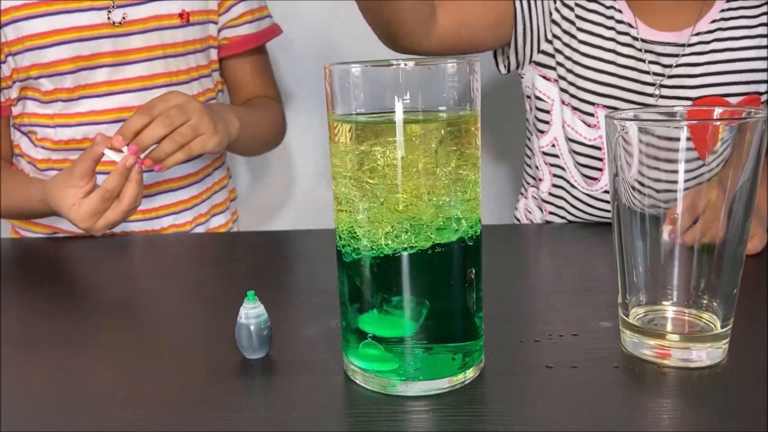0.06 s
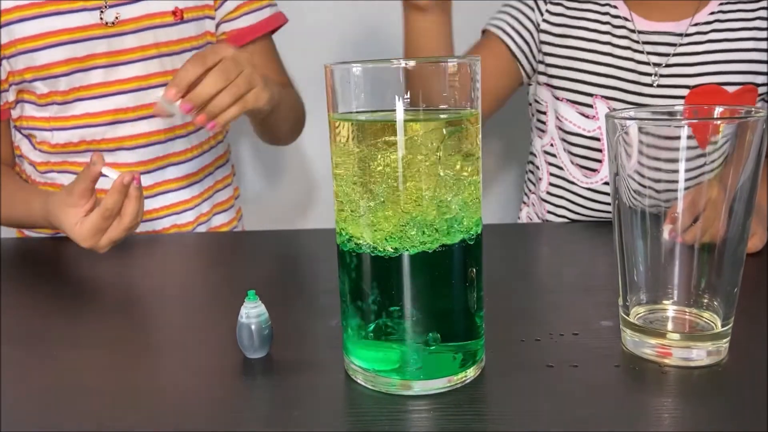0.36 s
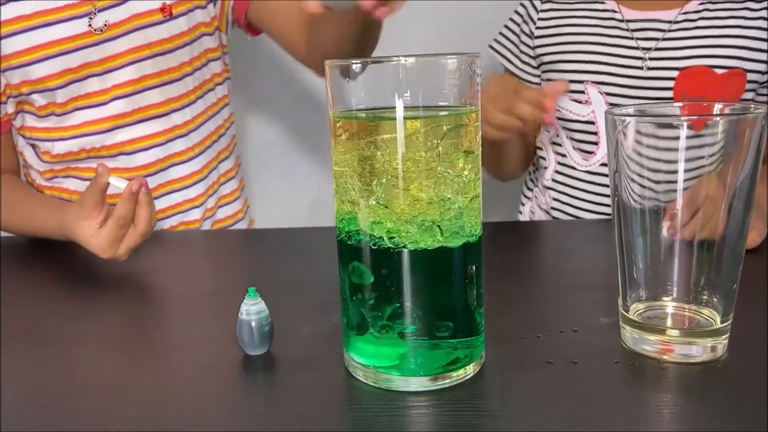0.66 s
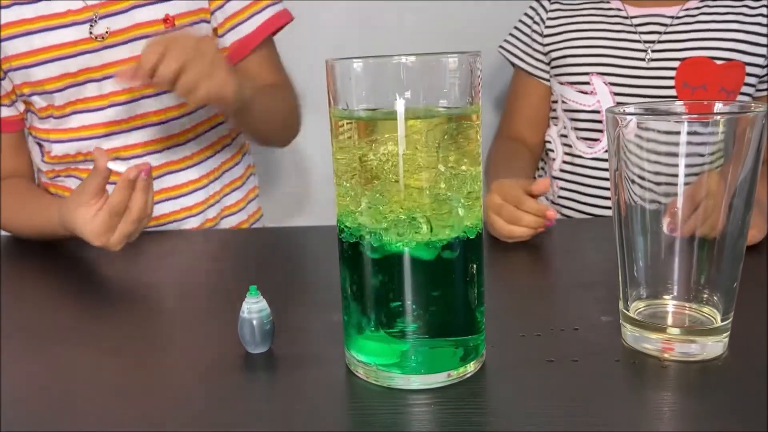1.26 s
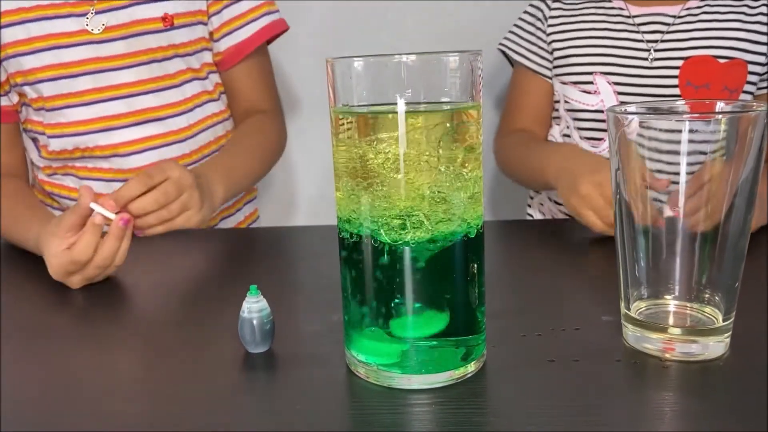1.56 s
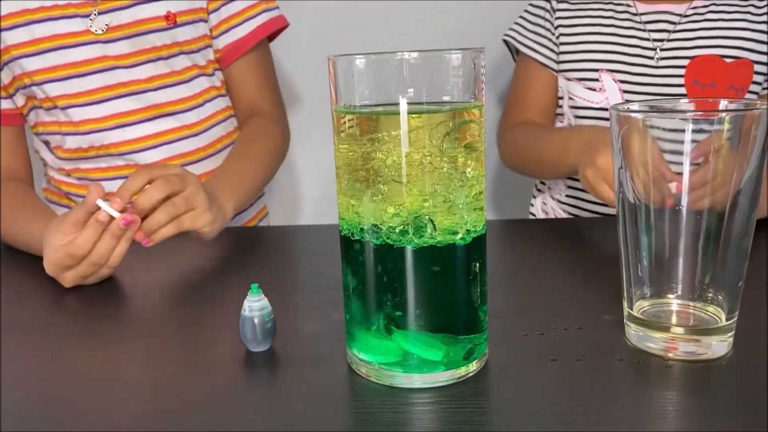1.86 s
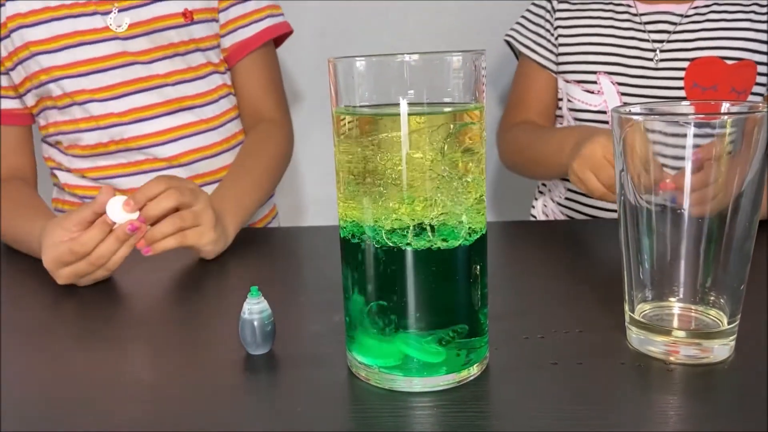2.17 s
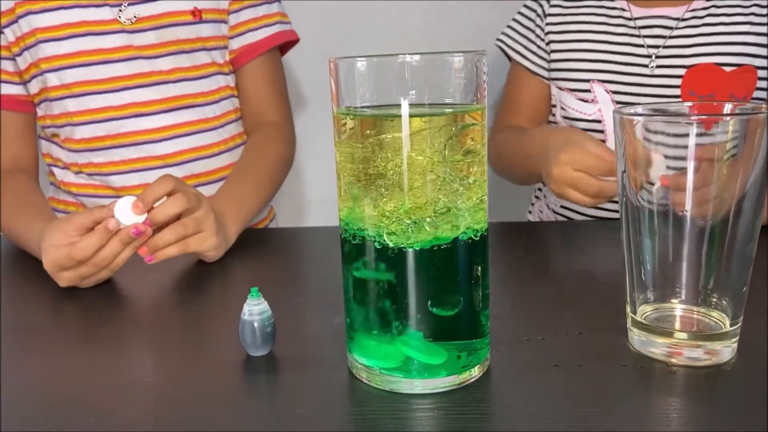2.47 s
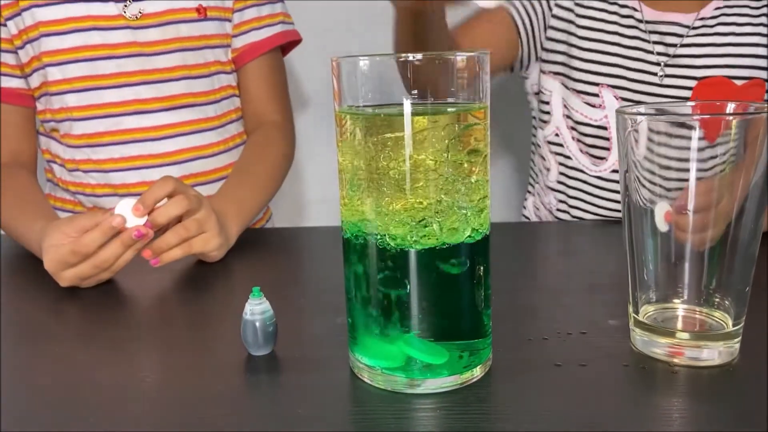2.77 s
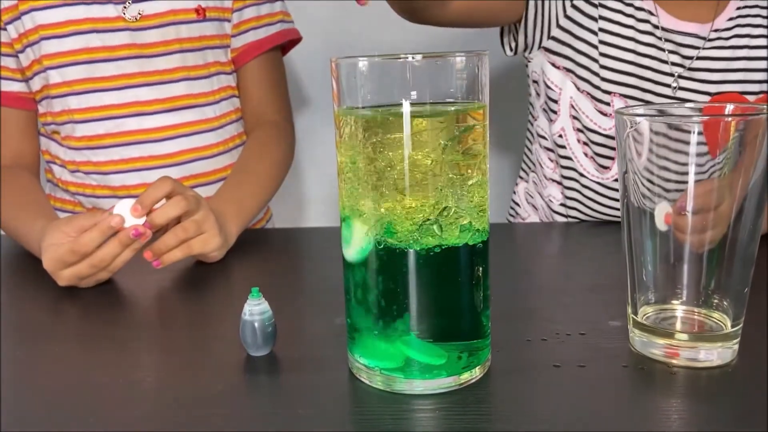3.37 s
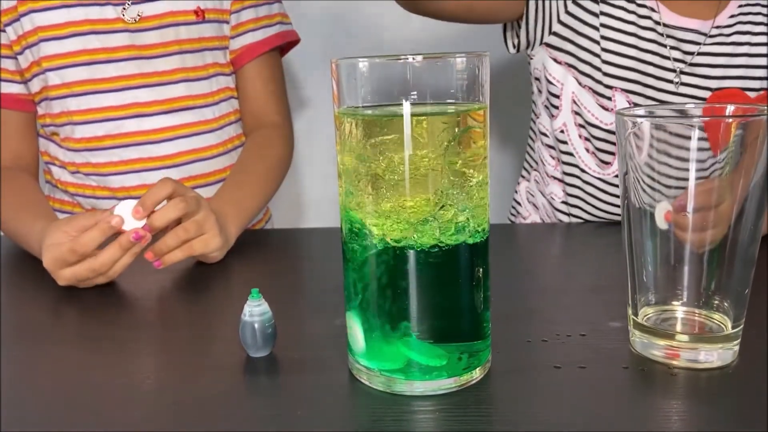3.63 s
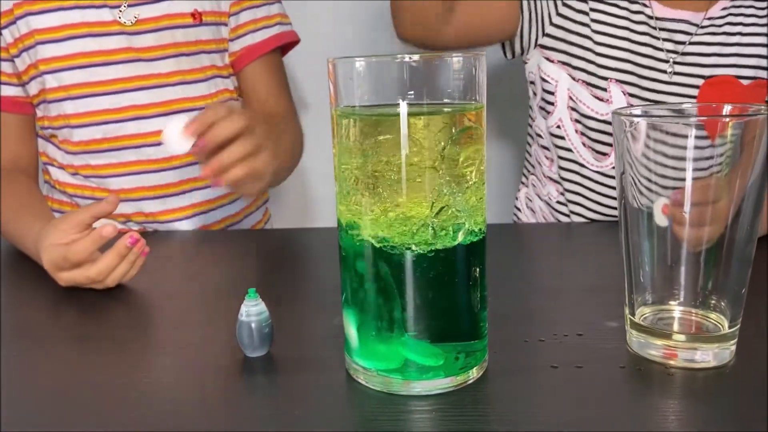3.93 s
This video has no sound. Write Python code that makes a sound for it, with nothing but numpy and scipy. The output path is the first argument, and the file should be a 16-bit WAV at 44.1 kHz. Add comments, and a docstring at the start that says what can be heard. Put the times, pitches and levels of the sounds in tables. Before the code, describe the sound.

Tablets plop into a glass of liquid and knock against it over a low hum.

```python
"""Fizzy tablets, dropped by two children, splash into a tall glass of oil and water.
Each impact on the surface gives a crack and spray and traps air, which resonates as bubbles;
the sinking tablets knock on the glass, mostly with low thuds and resonances of glass and table.
Faint fizz ticks, sleeves and fingers rustle by friction, and a dry tablet clicks near the end.
The small room reflects the sounds of the glass and is filled with a low ventilation hum."""
import sys
import numpy as np
from scipy import signal
from scipy.fft import rfft, irfft
from scipy.io import wavfile

SR = 44100
rng = np.random.default_rng(int(sys.argv[2]) if len(sys.argv) > 2 else 0)


def unload_wav(signal):
    """Save mono or channel-first audio to the path in sys.argv[1] as 16-bit WAV at rate SR, clipped to [-1, 1]."""
    wavfile.write(
        sys.argv[1],
        SR,
        np.round(np.clip(np.atleast_2d(signal).T, -1, 1) * 32767).astype(np.int16),
    )


N = 176400
T = np.arange(N) / SR
HZ = np.maximum(np.arange(N // 2 + 1) * SR / N, 1)

# Spectra of the noise sources and the reverberation. Each row: frequency in Hz, relative level in dB.
AIR_SPECTRUM = [(20, -37), (30, -18.5), (42, -6), (58, 0.5), (75, -2.5), (94, -1), (135, -11), (180, -8.5),
                (215, -13), (290, -18.5), (380, -21), (560, -29.5), (900, -29), (1400, -35), (1750, -46)]
HISS_SPECTRUM = [(1000, 14.5), (2500, 3), (5000, 1), (8000, -1.5), (15000, -6.5)]
CLOTH_SPECTRUM = [(600, -3.5), (1800, -1.5), (3100, -1), (4500, -9.5), (7000, -23), (15000, -32)]
RUB_SPECTRUM = [(3000, -22), (7000, -3), (11000, -0.5), (15000, 2)]
SPRAY_SPECTRUM = [(200, 18), (400, 6), (800, 5), (1300, 17), (1750, -16.5), (2300, 6.5), (2750, 3.5),
                  (3300, 5), (4200, -2.5), (4900, 3), (5600, -5.5), (6500, 4.5), (8000, -2.5), (15000, -11)]
ROOM_SPECTRUM = [(150, -7), (400, 1), (800, -7), (1600, -2.5), (3000, -0.5), (7000, -2), (15000, -3.5)]
# Likeness of the two channels. Each row: frequency in Hz, left-right correlation.
NOISE_COHERENCE = [(30, 1), (120, 0.93), (250, 0.67), (600, 0.12), (1500, 0.053), (5000, 0.55), (12000, 1)]
ROOM_COHERENCE = [(150, 0.66), (350, .6), (700, 0.25), (1300, 0.043), (5000, 0.13), (11000, 1)]
# Swell of the deepest rumble. Each row: time in seconds, gain in dB.
RUMBLE_SWELL = [(0, 1), (.6, 0.5), (1.25, 3.5), (1.9, 2.5), (2.5, -5.5), (3.2, 1), (4, -3.5)]
# Ventilation tones. Each row: frequency in Hz, rms level in dB.
HUM_TONES = [(58.5, -61.5), (119, -62.5), (187, -64.5)]
# Reflections from table and walls. Each row: delay in seconds, gain in dB, pan in dB,
# lag of the right side in seconds.
ECHOES = [(.0031, -11.5, 2.5, .0002), (.0086, -10, -5.5, -0.0096), (0.011, -10.5, 2, -.0004),
          (.0165, -14.5, -1.5, .0005), (.0205, -18, -10.5, -.0003), (.0275, -21, -6, .0006)]
# Sleeves moving and fingers rubbing dry tablets. Each row: time in seconds, level in dB.
SLEEVE_LEVELS = [(0, -89), (.4, -89), (.6, -78.5), (.78, -76), (.92, -82.5), (1.25, -93), (1.42, -75),
                 (1.64, -88.5), (1.82, -76), (1.93, -84.5), (2.12, -76.5), (2.22, -82.5), (2.52, -76.5),
                 (2.65, -89.5), (2.73, -79), (2.84, -85.5), (2.89, -74.5), (2.98, -90.5), (3.7, -93.5),
                 (3.82, -78), (3.92, -91), (4, -78.5)]
RUB_LEVELS = [(0, -107), (.45, -86.5), (.73, -78.5), (.84, -92), (1.32, -91), (1.42, -75.5), (1.54, -90),
              (1.85, -86), (2.1, -85.5), (2.28, -92), (2.45, -83), (2.54, -88), (2.9, -84), (3.1, -91),
              (3.65, -91.5), (3.98, -83.5)]
# Low thuds and resonances of glass and table, mostly sounding with the tablets' knocks.
# Each row: start in seconds, frequency in Hz, level in dB, T60 in seconds.
THUDS = [(1.535, 231, -45.5, 0.21), (1.61, 630, -60, 0.043), (1.726, 330, -47, 0.029),
         (2.122, 66, -33.5, 0.05), (3.313, 336, -51.5, 0.052), (3.671, 168, -41, 0.15),
         (3.68, 311.3, -49, .33), (3.747, 94, -43, 0.19)]
# Modes of the thin wall and the filled glass. Each row: frequency in Hz, gain in dB, T60 in seconds.
WALL_MODES = [(529.6, -2, 0.93), (1300, -2.5, 0.69)]
GLASS_MODES = [(248.8, -22, 0.38), (310.4, -17.5, 0.34), (405, -8, 0.09), (454.7, -9, 0.084),
               (616, -20.5, 0.14), (762, -14.5, 0.078), (850, -15.5, 0.18), (946, -23.5, 0.15),
               (1088, -14, 0.052), (1421, -7.5, 0.021), (1585, -8.5, 0.029), (1744, -11, 0.023),
               (2260, -17.5, 0.024), (2430, -22, 0.02)]
# A tablet clips the wall. Each row: start in seconds, level in dB.
WALL_TAPS = [(3.3761, -60.5)]
# A tablet meets the glass. Each row: start in seconds, knock level in dB, its frequency in Hz,
# its T60 in seconds, glass ring gain in dB, the ring's low and high edges in Hz, pan in dB.
KNOCKS = [(0.2333, -28, 754, 0.035, -33.5, 1170, 2320, 0),
          (1.6835, -38.5, 822, 0.018, -49.5, 600, 2230, -1),
          (1.724, -32.5, 1220, 0.0086, -41.5, 400, 1720, 1), (2.119, -46, 860, 0.011, -59.5, 600, 1310, 4),
          (3.3112, -46.5, 714, 0.069, -47, 397, 1190, 5), (3.3763, -33.5, 710, 0.022, -37, 980, 3300, 1),
          (3.6674, -20.5, 712, 0.017, -28, 227, 1366, 2.5)]
# Bubble plips and, in the last two rows, a small, close, dry tablet click.
# Each row: start in seconds, frequency in Hz, level in dB, T60 in seconds,
# fractional rise in pitch, pan in dB, relative gain into the room in dB.
PLIPS_AND_CLICK = [(1.0015, 4740, -32.5, 0.011, 0.13, 5.5, -2), (1.001, 1286, -41.5, 0.019, 0.055, 7, -2),
                   (1.001, 2090, -49.5, 0.018, 0.065, 3, -4), (1.0022, 3480, -45, 0.0073, 0.14, 8, 1),
                   (1.2112, 7100, -53, 0.0045, 0.088, 1, 2), (1.2255, 6700, -58, 0.0054, .12, 1, 1),
                   (1.264, 7100, -67, 0.0087, .04, 3, -4), (1.7225, 7270, -47.5, 0.011, .12, 0, -8),
                   (1.7219, 2550, -51, 0.0077, .15, 6, 0), (3.3117, 1686, -32, 0.023, 0.17, 3, 3.5),
                   (3.3104, 7200, -58, 0.006, 0.017, 2, 1), (3.314, 1040, -52.5, 0.046, 0.027, 3.5, 2),
                   (3.3758, 2320, -35.5, 0.01, 0.1, 4, -2), (3.3765, 3200, -48, 0.01, .12, 6, 5),
                   (3.376, 5030, -40, 0.0047, 0.13, 17, -15), (3.375, 5800, -32, 0.0043, 0.075, 6.5, -13),
                   (3.8827, 4300, -54, 0.018, 0.16, 4, -5), (3.885, 4440, -45.5, 0.013, 0.14, 6, -11)]
# A tablet or droplet hits the liquid. Each row: start in seconds, spray level in dB,
# its time constant in seconds, its high edge in Hz, crack level in dB, pan in dB.
SLAPS = [(0.9728, -48.5, 0.0059, 3230, -52, 1), (1.0005, -37, 0.0031, 14800, -27.5, 0),
         (1.6832, -62, 0.0044, 4620, -64, 3), (1.7225, -49.5, 0.0036, 2930, -45, 1.5),
         (2.612, -89, 0.0017, 15000, -59, 8), (2.9, -82, .003, 14700, -57, 3),
         (3.258, -69, .008, 11800, -58, 3), (3.3112, -46, 0.0024, 15320, -35.5, 2),
         (3.3757, -43, 0.0034, 6300, -44, 0.5), (3.667, -47.5, 0.0039, 2500, -61, 1),
         (3.812, -78, 0.0054, 12970, -68, 4), (3.8865, -66, 0.0024, 9950, -51, -1)]
# Phase between the microphone ports. Each row: frequency in Hz, lead of the left side in radians.
PORT_PHASE = [(20, 0), (3000, .45), (6900, 0), (9050, -3.14), (11100, -6.28), (13300, -9.42),
              (15000, -12.4)]


def from_db(db):
    """Amplitude grows tenfold every 20 dB."""
    return 10 ** (np.asarray(db) / 20)


def unit_rms(x):
    """Normalisation to unit mean power."""
    return x / np.sqrt(np.mean(x ** 2) + 1e-20)


def at_hz(points):
    """Interpolation on a logarithmic frequency axis."""
    hz, value = np.transpose(points)
    return np.interp(np.log(HZ), np.log(hz), value)


def envelope(points):
    """Amplitude over time, interpolated in decibels."""
    return from_db(np.interp(T, *np.transpose(points)))


def colour(x, spectrum):
    """Zero-phase filtering imposes a spectral shape."""
    return irfft(rfft(x) * from_db(at_hz(spectrum)), N)


def cut(x, hz, kind, order=2):
    """Causal high- or low-pass filtering."""
    return signal.sosfilt(signal.butter(order, hz, kind, fs=SR, output="sos"), x + 1e-18)


def stereo_noise(coherence):
    """Partial coherence: white noise with an in-phase and an antiphase part."""
    mid, side = rfft(rng.standard_normal((2, N)))
    spectrum = np.sqrt(1 + coherence) * mid + np.sqrt(1 - coherence) * side * [[1], [-1]]
    return unit_rms(irfft(spectrum, N))


def ring(hz, t60, rise=0):
    """A damped oscillator loses 60 dB in t60 seconds while its pitch gains the fraction rise."""
    t = T[:SR // 2]
    pitch = hz * (1 + rise * np.minimum(t / t60, 1))
    return from_db(-60 * t / t60) * np.sin(2 * np.pi * np.cumsum(pitch) / SR)


def attack(x, rise_s):
    """A finite rise time rounds the onset."""
    return x * (1 - np.exp(-T[:x.shape[-1]] / rise_s))


def add(out, sound, start, db, pan_db=0):
    """Superposition of a sound on the mix; pan is left level minus right level."""
    i = int(start * SR)
    part = sound[..., :N - i]
    out[:, i:i + part.shape[-1]] += from_db([[db + pan_db / 2], [db - pan_db / 2]]) * part


def ventilation():
    """Broadband noise and line spectrum: a slowly swelling rumble, thin hiss and steady hum."""
    coherence = at_hz(NOISE_COHERENCE)
    air = colour(stereo_noise(coherence), AIR_SPECTRUM)
    air = unit_rms(cut(air, 1700, "low", order=4))
    rumble = irfft(rfft(air) / (1 + (HZ / 100) ** 4), N)  # the part below 100 Hz
    air += rumble * (envelope(RUMBLE_SWELL) - 1)
    hiss = unit_rms(colour(stereo_noise(coherence), HISS_SPECTRUM))
    hum = sum(from_db(db) * np.sqrt(2) * np.sin(2 * np.pi * (hz * T + rng.random()))
              for hz, db in HUM_TONES)
    return from_db(-51.5) * air + from_db(-82) * hiss + hum


def room(x, t60=0.42, gap_s=0.004):
    """Reverberation: early reflections reach the two sides at different times over a diffuse tail."""
    fade = from_db(-60 * T / t60) * (T > gap_s)
    diffuse = colour(stereo_noise(at_hz(ROOM_COHERENCE)), ROOM_SPECTRUM)
    response = diffuse * fade / np.sqrt(np.sum(fade ** 2))
    for delay, db, pan_db, lag_s in ECHOES:
        response[0, int(delay * SR)] += from_db(db + pan_db / 2)
        response[1, int((delay + lag_s) * SR)] += from_db(db - pan_db / 2)
    return signal.fftconvolve(x, response[:, :SR], axes=1)[:, :N]


def rustle(levels, spectrum, roughness_db=1.5):
    """Friction noise of cloth or fingers, modulated by slow flutter and fine grain."""
    flutter = unit_rms(cut(rng.standard_normal(N), 24.9, "low"))
    grain = unit_rms(cut(rng.standard_normal(N), 600, "low"))  # single fibres catching
    friction = stereo_noise(at_hz(NOISE_COHERENCE)) * from_db(roughness_db * (flutter + grain))
    return envelope(levels) * unit_rms(colour(friction, spectrum))


def low_thuds():
    """Damped resonance: glass and table thud and ring at low frequencies."""
    out = np.zeros((2, N))
    for start, hz, db, t60 in THUDS:
        add(out, cut(ring(hz, t60), 2 * hz, "low"), start, db)
    return out


def fizz(ticks_per_s=56):
    """Shot noise: tiny bubbles burst independently at the surface."""
    bursts = rng.random(N) < ticks_per_s / SR
    strength = from_db(-73.5 - 4 * np.minimum(rng.exponential(1, N), 3))
    return cut(bursts * strength, 2500, "high")


def wall_ring():
    """Free vibration: tapped above the liquid, the lightly damped glass wall sings on faintly."""
    out = np.zeros((2, N))
    tone = sum(from_db(db) * ring(hz, t60) for hz, db, t60 in WALL_MODES)
    for start, db in WALL_TAPS:
        add(out, tone, start, db)
    return out


def glass_knocks():
    """Modal excitation: each contact knocks and rings a band of modes; the liquid cushions some."""
    out = np.zeros((2, N))
    modes = sum(from_db(db) * ring(hz, t60) for hz, db, t60 in GLASS_MODES)
    for start, db, hz, t60, ring_db, low_hz, high_hz, pan_db in KNOCKS:
        knock = from_db(db) * cut(ring(hz, t60), 2 * hz, "low")
        band = cut(cut(modes, low_hz, "high", order=3), high_hz, "low", order=9)
        contact = attack(knock + from_db(ring_db) * band, rise_s=0.0012)
        add(out, contact, start, 0, pan_db)
    return out


def plips_and_click():
    """Brief resonances of rising pitch: bubbles plip and a tablet clicks, direct and into the room."""
    direct, to_room = np.zeros((2, 2, N))
    for start, hz, db, t60, rise, pan_db, room_db in PLIPS_AND_CLICK:
        ping = attack(ring(hz, t60, rise), rise_s=0.00069)
        add(direct, ping, start, db, pan_db)
        add(to_room, ping, start, db + room_db, pan_db)
    return direct, to_room


def surface_slaps(rise_s=0.00046):
    """Impact on a liquid radiates an impulsive crack, then spray that dies in milliseconds."""
    out = np.zeros((2, N))
    spray = unit_rms(colour(stereo_noise(coherence=0.92), SPRAY_SPECTRUM))
    t = T[:SR // 10]
    crack = cut(1. * (t == 0), 2500, "high", order=1)
    for k, (start, db, decay_s, high_hz, crack_db, pan_db) in enumerate(SLAPS):
        noise = spray[:, k * len(t):(k + 1) * len(t)]
        burst = attack(noise * np.exp(-t / decay_s), rise_s)
        add(out, cut(burst, high_hz, "low"), start, db, pan_db)
        add(out, crack, start + rise_s, crack_db, pan_db)
    return out


def scene():
    """Superposition of all sources; the sharp, short sounds also excite the room."""
    rustles = rustle(SLEEVE_LEVELS, CLOTH_SPECTRUM) + rustle(RUB_LEVELS, RUB_SPECTRUM)
    hits = glass_knocks() + surface_slaps() + fizz()
    pings, pings_to_room = plips_and_click()
    reverberation = room(hits + pings_to_room)
    return hits + pings + wall_ring() + low_thuds() + reverberation + rustles + ventilation()


def record(dry, cutoff_hz=15800):
    """Phase shift and band limit: the two microphone ports differ in the treble, and the top is cut."""
    left_lead = np.interp(HZ, *np.transpose(PORT_PHASE))
    shifted = irfft(rfft(dry) * np.exp(1j * left_lead * [[1], [0]]), N)
    return signal.sosfilt(signal.ellip(10, .1, 70, cutoff_hz, fs=SR, output="sos"), shifted)


dry = scene()
out = record(dry)
unload_wav(out)
```